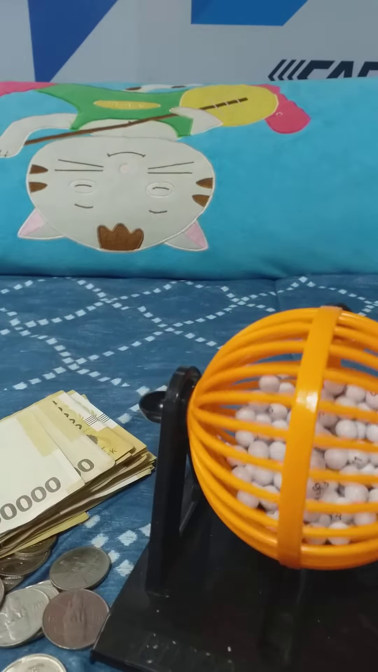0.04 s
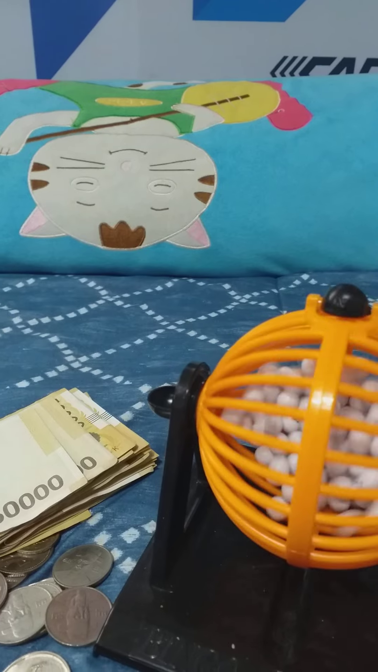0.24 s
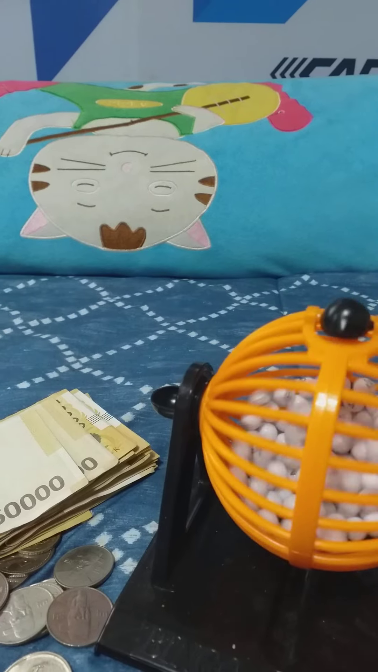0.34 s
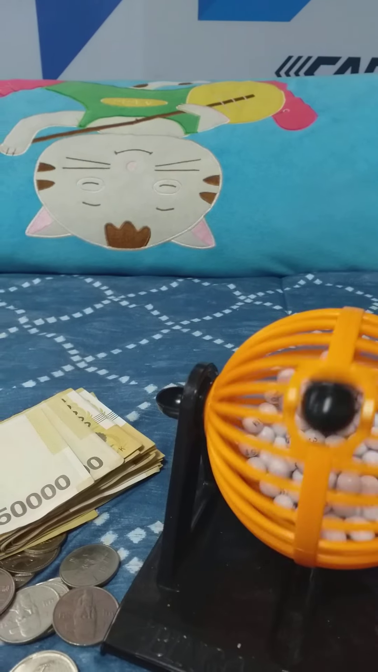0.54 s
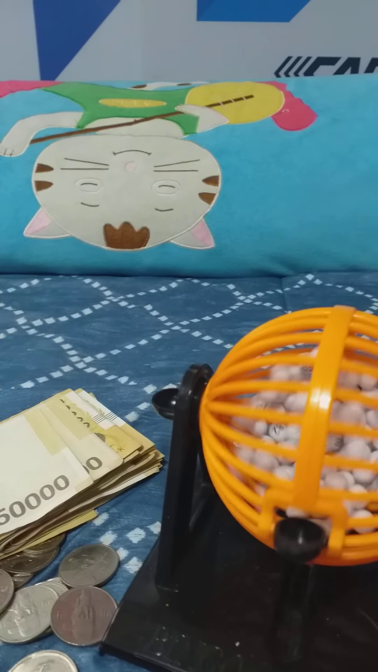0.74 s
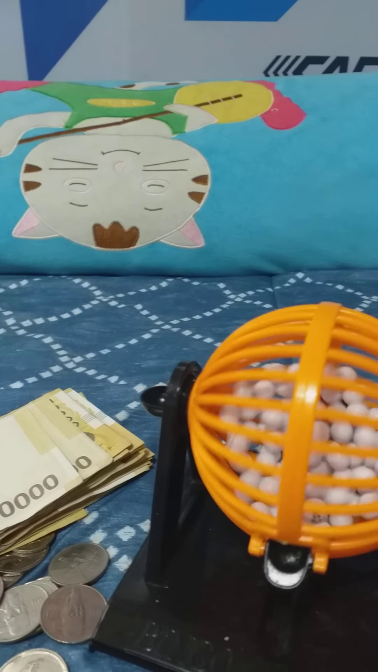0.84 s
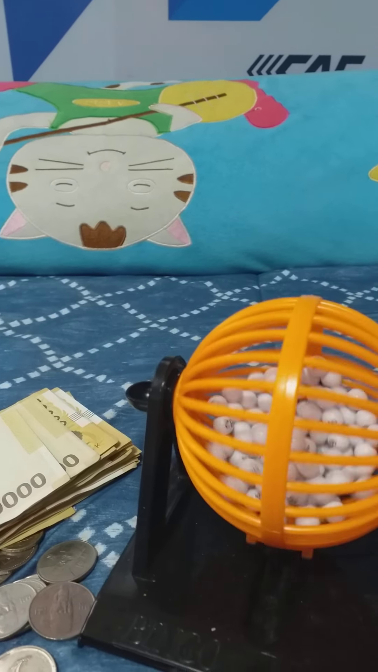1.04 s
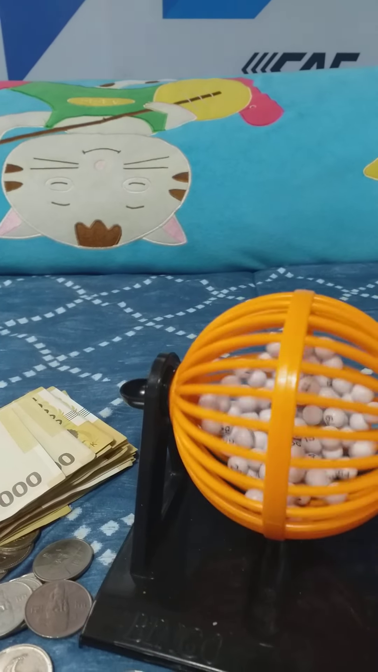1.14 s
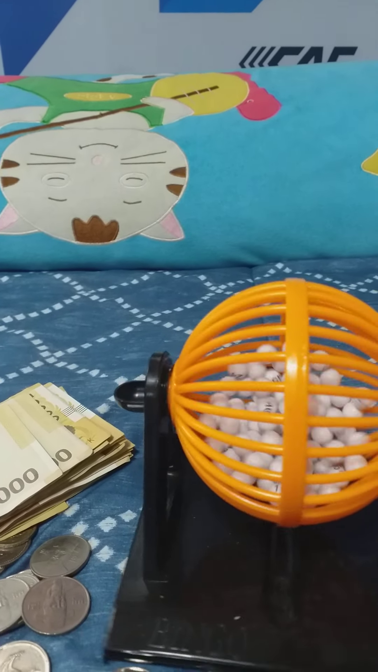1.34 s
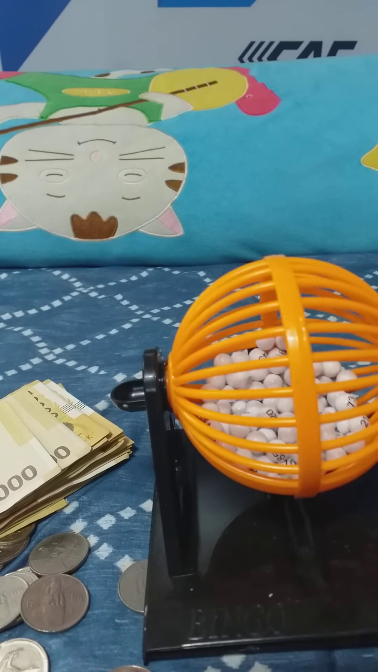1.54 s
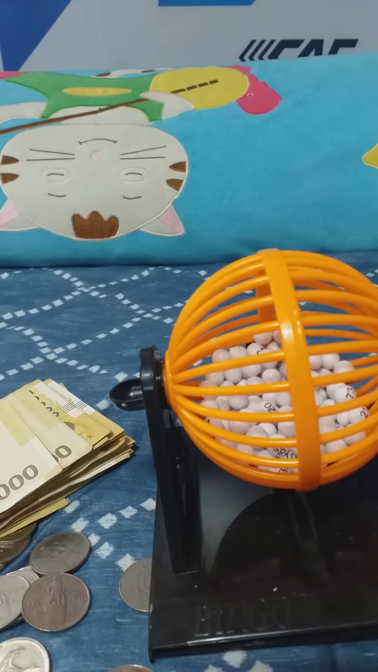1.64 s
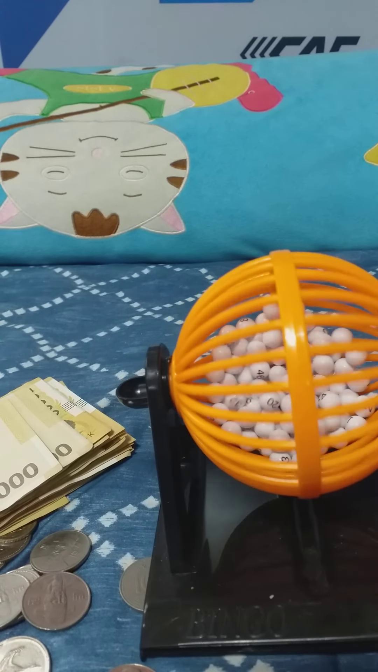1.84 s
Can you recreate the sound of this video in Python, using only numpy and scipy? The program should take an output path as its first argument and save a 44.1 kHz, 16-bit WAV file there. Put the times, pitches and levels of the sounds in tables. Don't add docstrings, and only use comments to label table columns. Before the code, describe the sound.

Close phone capture of light plastic balls rattling in a hand-turned cage, sliding in surging heaps with sharp clacks, briefly thinning, clattering again, then ticking to rest over faint fan hum and air hiss.

```python
import sys
import numpy as np
from scipy import signal
from scipy.fft import rfft, irfft, next_fast_len
from scipy.io import wavfile
from scipy.ndimage import uniform_filter1d

SR = 44100
rng = np.random.default_rng(int(sys.argv[2]) if len(sys.argv) > 2 else 0)


def gain_from_decibels(decibels):
    exponent = np.asarray(decibels, float) / 20
    return 10 ** exponent


def wav_out(sig):
    wavfile.write(sys.argv[1], SR, np.round(np.clip(np.atleast_2d(sig).T, -1, 1) * 32767).astype(np.int16))


N = 83790

# (frequency [Hz], level [dB])
AIR_COLOUR = [(40, -7), (110, -6), (620, -9), (880, -18), (1900, -20.5), (7600, -23), (8600, -31),
              (15500, -31.5)]
# (time [s], hiss level [dB])
HISS_CHANGES = [
    (0, 4),
    (.1, -2),
    (1.64, 1.5),
    (1.7, 2.5),
    (1.77, 1.5),
    (1.8, -3),
    (1.825, 0),
    (1.835, 5.5),
]
# (frequency [Hz], rms level [dB])
FAN_TONES = [(77.5, -64.5), (103.5, -67.5), (119.5, -63), (178, -89), (639, -71.5)]
# (time [s], peak level [dB], pitch [Hz])
STAND_KNOCKS = [(0.0729, -45.5, 1580), (0.2817, -25, 1590), (0.5723, -20, 1547), (0.609, -18.5, 1550),
                (1.283, -42, 1630), (1.4047, -29, 1240), (1.4309, -30, 1130), (1.5178, -34, 1110),
                (1.6433, -46, 1143), (1.7544, -41, 1190), (1.8315, -52, 1090), (1.7545, -42.5, 2420),
                (1.837, -40, 2400)]
# (time [s], level [dB], collisions [per ms])
TUMBLING = [(.13, -58, 0.72), (0.166, -36.5, 1.8), (0.187, -29, 0.87), (0.197, -44, 2), (0.229, -23, 3.2),
            (0.322, -14, 4.7), (0.439, -21.5, 3.9), (0.519, -26.5, 1.55), (.641, -30.5, 1.8),
            (0.649, -23, 2.53), (.76, -18.5, 4.8), (0.871, -17, 4.9), (0.971, -24.5, 2.8),
            (1.238, -29, 1.14), (1.278, -24, 3), (1.409, -28.5, 1.75), (1.49, -39, 1.7), (1.54, -52.5, 1)]
# (time [s], peak level [dB], ribs level [dB], shell top level [dB])
SETTLING_TICKS = [(0.0154, -55, -3, 1), (0.0289, -38.5, -2.5, -2.5), (0.075, -48.5, 0.5, -6.5),
                  (0.096, -55, 7.5, -7), (0.1354, -43, 3, 2), (0.1415, -40, -3, -18), (1.4534, -34, 3, -18),
                  (1.4663, -28, 1, 2), (1.491, -28, -7.5, -10), (1.496, -26, -4, -22),
                  (1.5179, -25, -8, -5), (1.5348, -43.5, 5, -20), (1.5594, -38.5, -3, -20),
                  (1.569, -30.5, -9, -21), (1.576, -35.5, -2.5, -6), (1.5848, -37, -2, -7),
                  (1.596, -30, -3.5, -1), (1.631, -43, -5, -3), (1.6397, -25.5, -7.5, -4),
                  (1.6567, -45, -2, -8), (1.6693, -41.5, 0, -5), (1.682, -46, -8, -10),
                  (1.702, -38.5, -5.5, -10), (1.7531, -39.5, -7, -14), (1.763, -50, -15.5, -30),
                  (1.8317, -45, -3, -14), (1.8356, -37, -2, -6), (1.8483, -33, -7, -29),
                  (1.8654, -46, 0, 3), (1.8764, -42, 2, -19), (1.8924, -40.5, -3, -10)]
# (time [s], peak level [dB], ribs level [dB], shell top level [dB])
HARD_CLACKS = [(0.153, -11, -7.5, -8.5), (0.2055, -11.5, -5.5, -1.5), (0.2273, -8.5, -9, 0),
               (0.2933, -3, -31, -9), (0.3028, -14, -21, 9), (0.3253, -5, -7, -2), (0.3617, -7, -6, 10),
               (0.4122, -6, -18, -1), (0.476, -32, -2, -7), (0.5407, -17, -22, -27), (0.5626, -11.5, -2, 3),
               (0.606, -45, 1, -12), (0.6457, -10.5, -4.5, 1), (0.6668, -16, -25, -7),
               (0.7, -11.5, -17, -15), (0.7787, -1.5, -13, -24), (0.839, -3, -12, 4),
               (0.8834, -10.5, 2.5, 0), (0.9065, -12, 2, -4), (1.047, -17.5, 1, 7),
               (1.0778, -16.5, -4, 12.5), (1.0944, -27, 3.5, -14), (1.1334, -11.5, -14, 3),
               (1.15, -9, -5.5, 1), (1.205, -10, -26, -15), (1.2297, -11, -26, -6), (1.2737, -5, -9, -1),
               (1.2883, -3.5, -44, -2), (1.4313, -3, -14.5, -13), (1.4363, -14, -7, -7),
               (1.421, -27, -13, -8)]
# (time [s], peak level [dB], ribs level [dB], shell top level [dB])
MORE_CLACKS = [(0.2741, -2.5, -11.5, 0), (0.3215, -5, -4, 7), (0.3434, -12, -2, 7), (0.3765, -8.5, -10, 3),
               (0.388, -9, -14, -4), (0.4497, -15.5, 2, 8), (0.4712, -23, 7, 10), (0.6248, -20, 5, -9),
               (0.7158, -3, -15, -14), (0.7263, -2.5, -8.5, -10), (0.7414, -5, -24, -3),
               (0.7517, -17, -3, -4), (0.7674, -8, -2, 3), (0.804, -6, -8, -4), (0.8193, -4, -8, 4),
               (0.8729, -9, -6, 10), (0.9153, -12, -1, 9.5), (0.9339, -14, 3, 9), (0.954, -15.5, 0, 9),
               (0.9687, -21.5, 10, 13), (1.0104, -17, 2.5, 8), (1.2495, -16, -4, -11),
               (1.3032, -23, -14, -9), (1.318, -9, -22, -4), (1.3317, -14, -14, -16), (1.3547, -9, -27, -22),
               (1.3899, -7.5, -17, -8)]
# (frequency [Hz], level [dB], time to fall 60 dB [s])
RIB_TONES = [(1153, -8, 0.014), (1566, -9.5, 0.025), (2095, -6.5, 0.022), (2410, -4.5, 0.033),
             (2880, -17, 0.014), (3650, -7, 0.014), (4340, 2, 0.009), (5200, -6, 0.012)]
# (frequency [Hz], level [dB], time to fall 60 dB [s])
SHELL_TONES = [(6210, -1, 0.014), (6600, 2, 0.013), (6760, 6, 0.016), (7080, 0, 0.014), (7560, -4.5, 0.016)]
# (frequency [Hz], level [dB], time to fall 60 dB [s])
SHELL_TOP_TONES = [(9880, 2.5, 0.013), (10400, -5, 0.011), (10880, -5, 0.011), (12060, -8, 0.008),
                   (12850, -2.5, 0.007), (13320, -.5, 0.008), (14600, -1, 0.008), (15320, 2, 0.0052)]

AIR_DB, HISS_ABOVE_HZ = -56.5, 790
KNOCK_T60_S, KNOCK_RISE_S, KNOCK_DB = 0.035, 0.0008, -2
THUD_HZ, THUD_DB, THUD_T60_S = 306, -35, 0.033
AVALANCHE_DB, AVALANCHE_HZ = 0.83, 24.92
SLIP_DB, SLIP_HZ, SLIP_FALL_S = 1, 80.2, 0.0026
CANDIDATES = 16000
SIZE_SCATTER_DB, BIGGEST = 3, 0.06
RIBS_DB, TOP_DB = -4, -2.5
DRIFT_DB, DRIFT_HZ, TURNOVER_HZ = 0.5, 13.33, 39.77
CLACK_DB, TOP_FADE_DB = -6.5, -5
BOUNCE_S, FIRST_DB, SECOND_DB, BOUNCE_DB = 0.0022, -0.5, -6, -4
SLIDE_START_S, SLIDE_END_S = 0.25, 1.4
SLIDE_STRETCH, SLIDE_FIRST_DB, SLIDE_FALL_DB = 1.6, -3.5, -1.5
RISE_S, CRACK_DB, CRACK_T60_S = 0.0001, -6, 0.013
SHELL_DETUNE, RIB_DETUNE, TONE_SCATTER_DB = 0.014, 0.013, 2.5
ROOM_DB, ROOM_T60_S, ROOM_DULL_HZ = -14.5, 0.08, 6000
LIMIT, MIC_LOW_HZ, TREBLE_TOP_HZ = 0.9, 53.5, 15720


def unit(x):
    return x / np.sqrt(np.mean(x ** 2))


def walk(rate_hz):
    step_number = (np.arange(N) * rate_hz / SR).astype(int) % 2000
    steps = rng.standard_normal(2000)[step_number]
    return unit(uniform_filter1d(steps, max(int(SR / rate_hz / 2), 1)))


def decay(t, t60):
    return np.exp(-np.log(1000) * t / t60)


def filtered(x, order, hz, kind):
    return signal.sosfilt(signal.butter(order, hz, kind, fs=SR, output="sos"), x)


def air_noise():
    hz, db = np.array(AIR_COLOUR).T
    f = np.maximum(np.arange(N // 2 + 1) * SR / N, 1)
    colour = gain_from_decibels(np.interp(np.log(f), np.log(hz), db))
    air = irfft(rfft(rng.standard_normal(N)) * colour, N)
    hiss = filtered(air, 2, HISS_ABOVE_HZ, "highpass")
    hiss_gain = gain_from_decibels(np.interp(np.arange(N) / SR, *np.array(HISS_CHANGES).T))
    return gain_from_decibels(AIR_DB) * unit(air + hiss * (hiss_gain - 1))


def fan_hum():
    t = np.arange(N) / SR
    hum = np.zeros(N)
    for hz, db in FAN_TONES:
        level = gain_from_decibels(db + 2 * walk(12)) * np.sqrt(2)
        hum += level * np.sin(2 * np.pi * hz * t + 0.4 * walk(9))
    return hum


def stand_knocks():
    out = np.zeros(N + 4096)
    t = np.arange(4096) / SR
    shape = decay(t, KNOCK_T60_S) * (1 - np.exp(-t / KNOCK_RISE_S))
    for s, db, hz in STAND_KNOCKS:
        out[int(s * SR):][:4096] += gain_from_decibels(db + KNOCK_DB) * shape * np.sin(2 * np.pi * hz * t)
    return out[:N]


def stand_thuds(times, force):
    push = gain_from_decibels(force) * rng.standard_normal(len(times))
    pushes = np.bincount((times * SR).astype(int), push, N)
    t = np.arange(4096) / SR
    thud = gain_from_decibels(THUD_DB) * decay(t, THUD_T60_S) * np.sin(2 * np.pi * THUD_HZ * t)
    return signal.oaconvolve(pushes, thud)[:N]


def slips():
    starts = (rng.random(N) < SLIP_HZ / SR) * rng.random(N)
    out = signal.lfilter([1], [1, -np.exp(-1 / (SLIP_FALL_S * SR))], starts)
    return 2 * np.tanh(unit(out - out.mean()) / 2)


def heap_blows():
    s, db, rate = np.array(TUMBLING).T
    length_s = s[-1] - s[0]
    place, chance, size, pick = rng.random((4, CANDIDATES))
    times = s[0] + place * length_s
    at = (times * SR).astype(int)
    per_ms = np.clip(np.interp(times, s, rate), 0.05, 10)
    happens = chance < per_ms * length_s * 1000 / CANDIDATES
    surge = AVALANCHE_DB * walk(AVALANCHE_HZ) + SLIP_DB * slips()
    force = np.interp(times, s, db) - 10 * np.log10(per_ms) - 5 + surge[at]
    force = force - SIZE_SCATTER_DB * np.log(np.maximum(size, BIGGEST))
    force = np.where(happens, force, -200)
    ribs = RIBS_DB + DRIFT_DB * walk(DRIFT_HZ)[at]
    top = TOP_DB + DRIFT_DB * walk(DRIFT_HZ)[at]
    ball = (times * TURNOVER_HZ + 5 * pick).astype(int)
    return times, ball, force, ribs, top


def single_blows(count=4):
    s, db, ribs, top = np.concatenate([SETTLING_TICKS, HARD_CLACKS, MORE_CLACKS]).T
    db = db + CLACK_DB * (np.arange(len(s)) >= len(SETTLING_TICKS))
    order = np.arange(count)[:, None]
    uneven = 0.6 + 0.73 * rng.random((count, len(s)))
    lag = BOUNCE_S * np.maximum(order - 0.5, 0) * uneven
    fall = np.where(order == 0, FIRST_DB, SECOND_DB + BOUNCE_DB * (order - 1))
    sliding = (s > SLIDE_START_S) & (s < SLIDE_END_S)
    lag = np.where(sliding, SLIDE_STRETCH * lag, lag)
    fall = np.where(sliding, SLIDE_FIRST_DB + SLIDE_FALL_DB * order, fall)
    ball = np.arange(len(s)) + order // 2
    top = top + TOP_FADE_DB * order
    return (s + lag).ravel(), ball.ravel(), (db + fall).ravel(), np.tile(ribs, count), top.ravel()


def ring(modes, detune):
    t = np.arange(2048) / SR
    hz, db, t60 = np.array(modes).T[:, :, None]
    strength, tuning, phase = rng.standard_normal((3, len(modes), 1))
    level = gain_from_decibels(db + TONE_SCATTER_DB * strength) * decay(t, t60)
    tones = level * np.sin(2 * np.pi * hz * (1 + detune * tuning) * t + 2 * phase)
    band = [hz.min() * 0.81, min(hz.max() * 1.1, 0.45 * SR)]
    noise = unit(filtered(rng.standard_normal(len(t)), 2, band, "bandpass"))
    crack = gain_from_decibels(CRACK_DB) * 2 * noise * decay(t, CRACK_T60_S)
    out = (tones.sum(axis=0) + crack) * (1 - np.exp(-t / RISE_S))
    out = filtered(out, 2, hz.min() * 0.71, "highpass")
    return out / np.sqrt(np.sum(out ** 2) / 40)


def collide(times, ball, shell_db, ribs_db, top_db, count=37):
    at = np.clip((times * SR).astype(int), 0, N - 1)
    size = next_fast_len(N + 2048)
    parts = ((SHELL_TONES, shell_db, SHELL_DETUNE),
             (RIB_TONES, shell_db + ribs_db, RIB_DETUNE),
             (SHELL_TOP_TONES, shell_db + top_db, SHELL_DETUNE))
    spectrum = 0
    for modes, db, detune in parts:
        for k in range(count):
            mine = ball % count == k
            blows = np.bincount(at[mine], gain_from_decibels(db[mine]), N)
            spectrum = spectrum + rfft(blows, size) * rfft(ring(modes, detune), size)
    return irfft(spectrum, size)[:N]


def room_tail(balls):
    t = np.arange(SR // 4) / SR
    tail = filtered(rng.standard_normal(len(t)), 1, ROOM_DULL_HZ, "lowpass")
    tail = tail * decay(t, ROOM_T60_S) * (t > 0.003)
    return gain_from_decibels(ROOM_DB) * signal.oaconvolve(balls, tail / np.sqrt(np.sum(tail ** 2)))[:N]


def scene():
    heap = heap_blows()
    blows = [np.concatenate(pair) for pair in zip(heap, single_blows())]
    balls = stand_thuds(heap[0], heap[2]) + stand_knocks() + collide(*blows)
    return (balls + room_tail(balls) + air_noise() + fan_hum())[None]


def top_cut(x):
    return signal.sosfilt(signal.butter(12, 16820, fs=SR, output="sos"), x)


def record(dry):
    limited = LIMIT * np.tanh(dry / LIMIT)
    mix = filtered(limited, 3, MIC_LOW_HZ, "highpass")
    mix = signal.sosfilt(signal.ellip(10, 0.3, 60, TREBLE_TOP_HZ, fs=SR, output="sos"), mix)
    return top_cut(mix)


dry = scene()
out = record(dry)
wav_out(out)
```